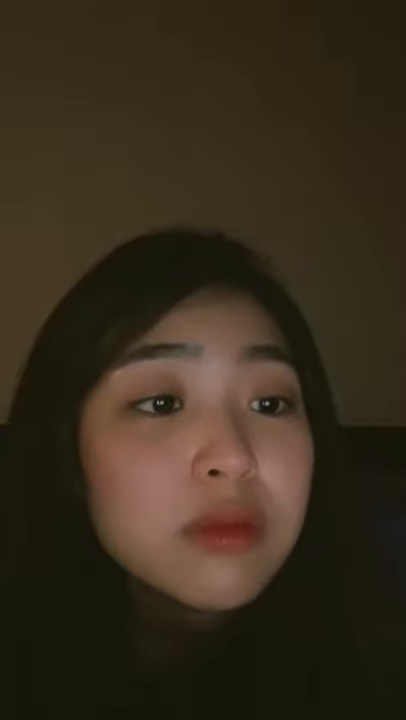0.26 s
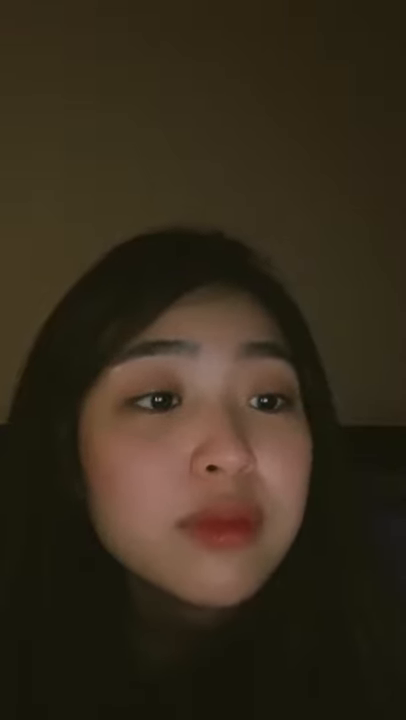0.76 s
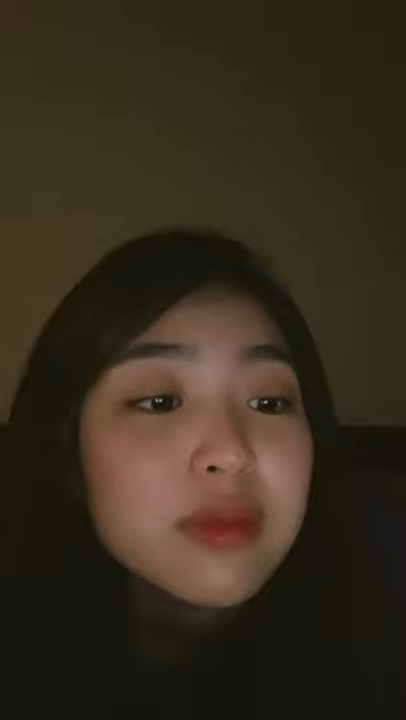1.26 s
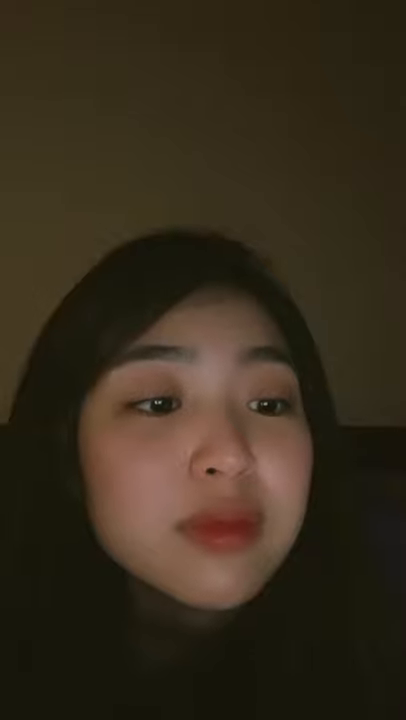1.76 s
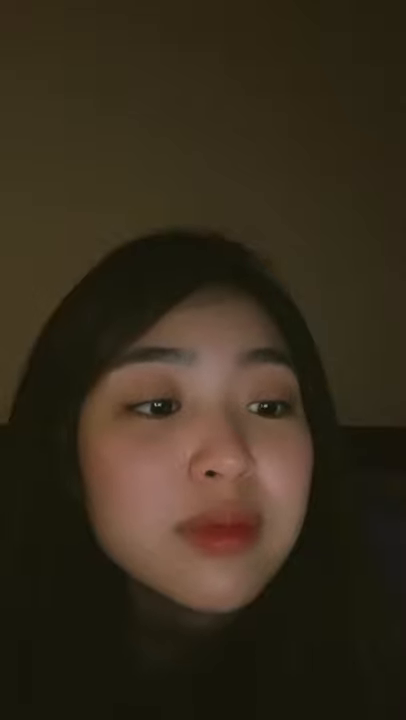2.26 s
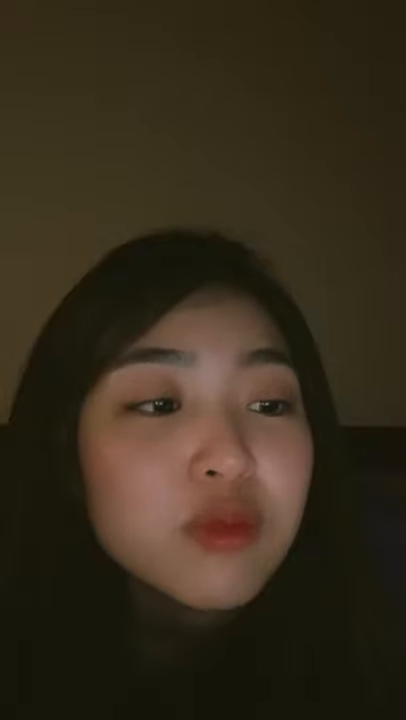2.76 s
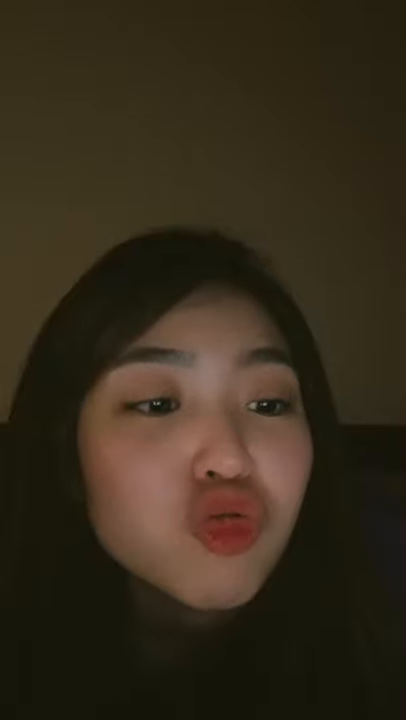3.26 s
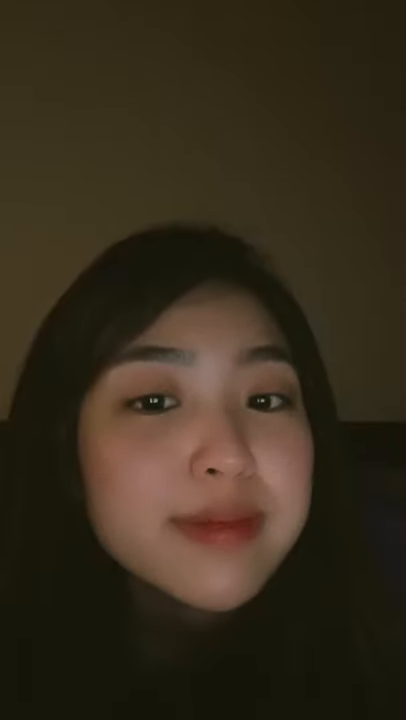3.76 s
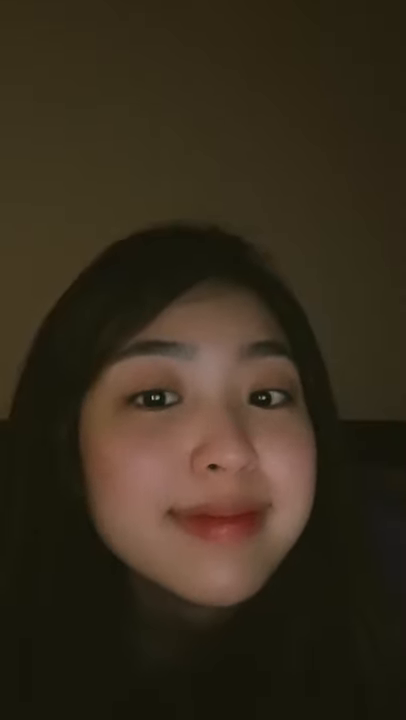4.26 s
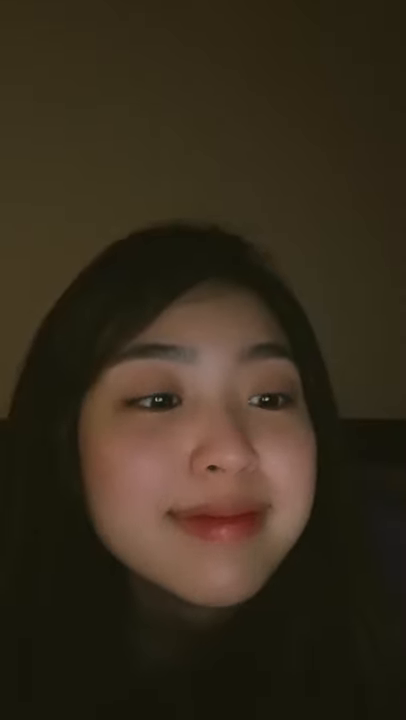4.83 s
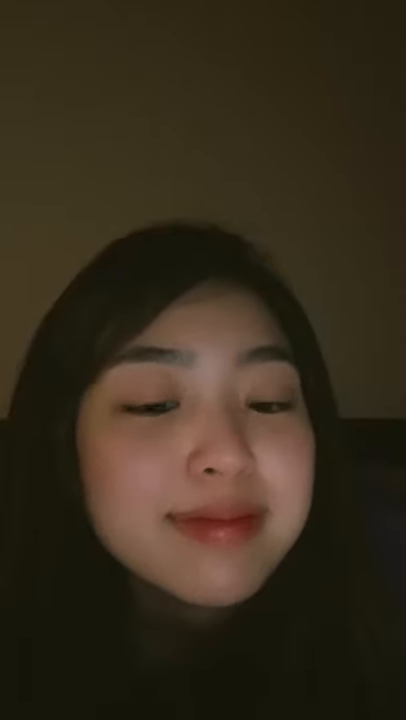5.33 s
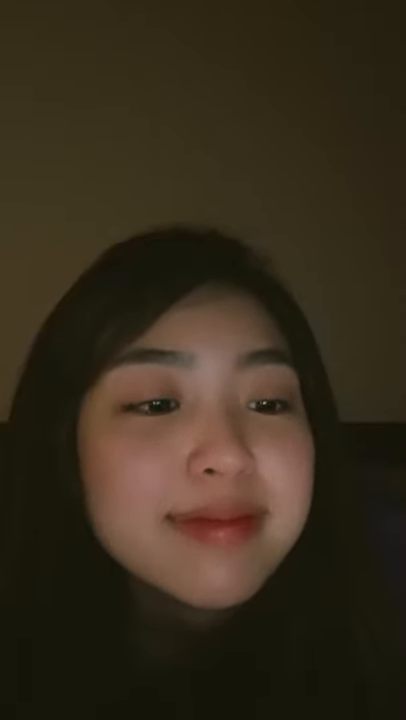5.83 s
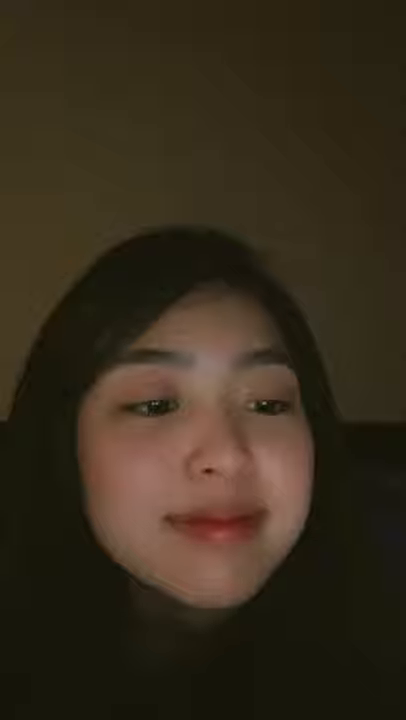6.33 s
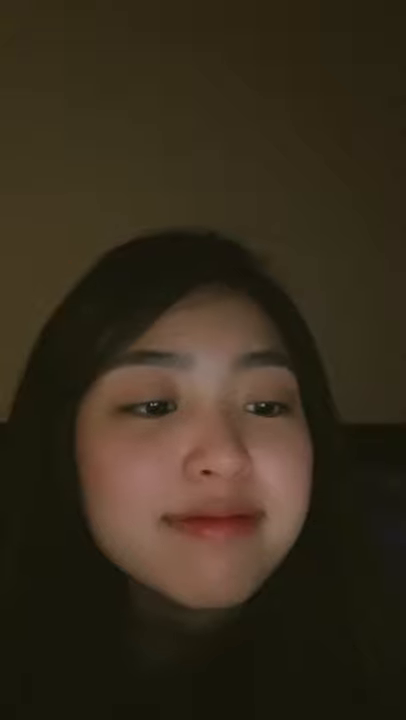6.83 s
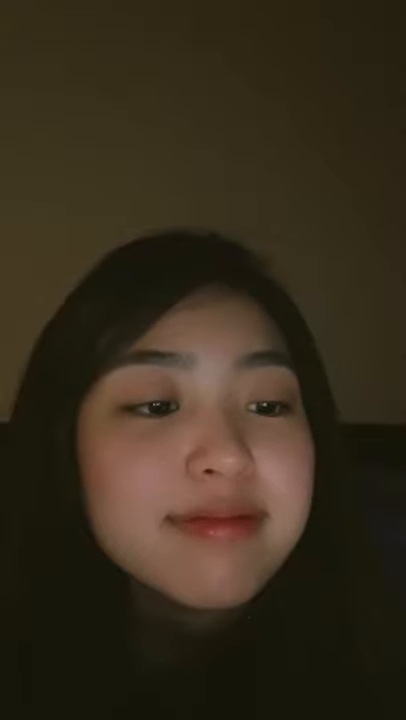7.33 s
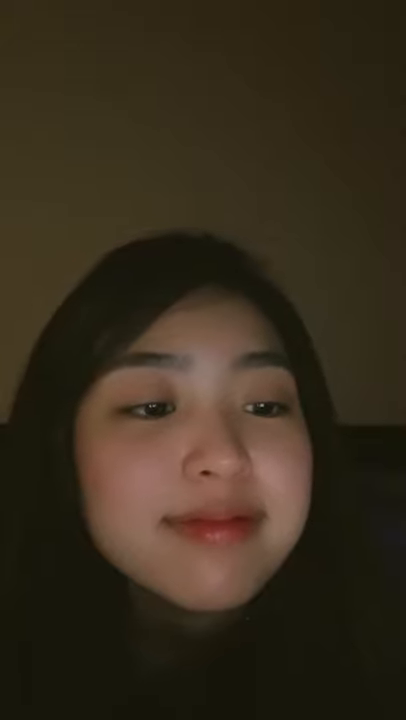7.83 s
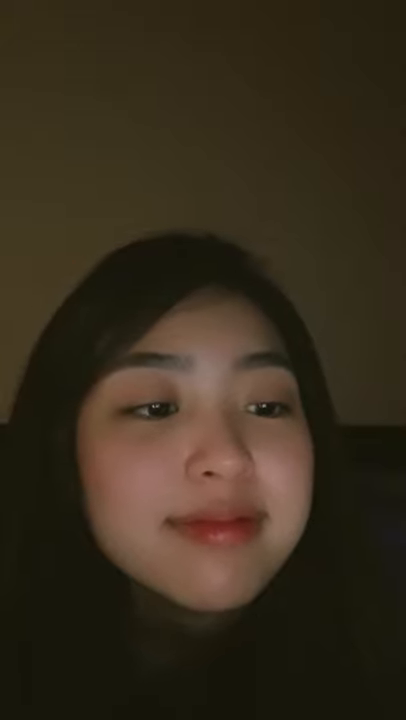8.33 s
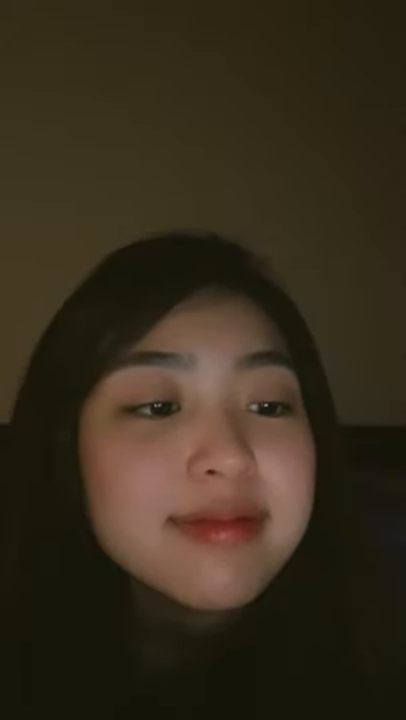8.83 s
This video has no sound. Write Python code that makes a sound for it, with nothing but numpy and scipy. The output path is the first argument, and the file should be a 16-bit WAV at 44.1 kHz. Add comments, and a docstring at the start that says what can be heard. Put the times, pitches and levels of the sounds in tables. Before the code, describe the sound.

Very close phone typing, picked up through the case in a small, quiet room with a short, faint tail. Modest clicks and soft thumps come first, then a near-silent gap. Lips squeak, fizz and snap wetly, followed by sparse grazing ticks and faint skin-on-glass strokes. Finally heavy rapid thumb taps knock the case in uneven bursts, mixed with sharp nail clicks and brief scuffs.

```python
"""Fast typing on a phone

Two thumbs type on a phone held close in a quiet room; its own microphone hears them through the case.
Tips and flats of the thumbs give a gritty click (skidding noise) and a dull knock (a short swing of the
case); grazing nails only click. In the pause come a squeaky kiss (fluttering lips, pops and wet fizz)
and a fingertip sliding over the glass (grainy noise). Then the typing resumes, harder."""
import sys
import numpy as np
from scipy import signal
from scipy.fft import rfft, irfft, next_fast_len
from scipy.io import wavfile
from scipy.ndimage import uniform_filter1d

SR = 44100
rng = np.random.default_rng(int(sys.argv[2]) if len(sys.argv) > 2 else 0)


def to_wav(s):
    """Save 16-bit WAV."""
    ch = np.atleast_2d(s).T  # columns
    pcm = np.round(np.clip(ch, -1, 1) * 32767)  # PCM
    wavfile.write(sys.argv[1], SR, pcm.astype(np.int16))


N = 400850  # length in samples

# Hum and hiss of the room and microphone: f/Hz, level/dB (only the shape counts)
QUIET_SPECTRUM = [(24, -21), (40, -1), (101, 0), (163, -11), (290, -7), (329, -10.5), (556, -13.5),
                  (790, -14), (965, -18.5), (2050, -18), (3470, -23.5), (3930, -21), (16000, -42)]
QUIET_DB = -63  # rms
# Colour of the sound coming back from the walls: f/Hz, level/dB (only the shape counts)
ROOM_SPECTRUM = [(60, 26), (250, -1.5), (900, 0), (2500, -16), (5000, -5.5), (14000, 5)]
# Nearby surfaces return the knock: delay/s, level/dB
NEARBY_ECHOES = [(.0175, -25.5), (0.041, -52)]

# Colour of the rumble of the case under friction: f/Hz, level/dB (only the shape counts)
RUMBLE_SPECTRUM = [(45, -18.5), (120, -0.5), (200, -3), (300, 6.5), (430, -7.5), (530, -13), (720, -1.5),
                   (950, -15), (1600, -21), (3000, -70)]
# Colour of the hiss of scraping nails and skin: f/Hz, level/dB (only the shape counts)
SCUFF_HISS_SPECTRUM = [(500, -25), (1100, -3), (2400, -0.5), (3200, -3), (4200, -9.5), (5100, -6.5),
                       (8000, -15.5), (9200, -22.5), (15000, -41.5)]
# Nails and skin scrape between taps: t/s of the peak, level/dB, swell time/s
SCUFF_EVENTS = [(5.561, -46, 0.012), (5.64, -43, 0.037), (5.796, -39.5, 0.017), (5.99, -53.5, 0.044),
                (6.2, -55.5, .04), (6.37, -42, 0.038), (6.533, -33, 0.0014), (6.56, -52, 0.044),
                (6.902, -31.5, 0.019), (7.23, -48, 0.05), (7.345, -50, 0.049), (7.45, -64, 0.067),
                (8.042, -46.5, .017), (8.133, -25, 0.002), (8.228, -48.5, .025), (8.37, -48.5, 0.019),
                (8.51, -36, 0.0039), (8.57, -38.5, 0.022), (8.981, -50.5, 0.02)]
SCUFF_FALL = 1.05  # dying time over swelling time
# Colour of the hiss of a fingertip on glass: f/Hz, level/dB (only the shape counts)
FINGERTIP_SPECTRUM = [(700, -17), (1400, -7), (2300, 3.5), (3100, 3), (3900, -13), (5100, -10.5),
                      (5900, -17.5), (14000, -36)]
# A fingertip strokes the glass: start t/s, end t/s, rumble level/dB, hiss level/dB at the outset
FINGERTIP_STROKES = [(4.49, 4.748, -47.5, -48), (4.789, 4.948, -47.5, -60.5), (4.991, 5.091, -48, -60.5),
                     (5.182, 5.27, -52.5, -56.5)]
STROKE_ATTACK_S, STROKE_RELEASE_S = 0.0042, 0.013
HISS_FADE_DB_PER_S = 54  # the skin hisses most as it sets off

# Resonances of the small gap between the lips: f/Hz, level/dB (only the shape counts)
LIP_GAP_SPECTRUM = [(500, -29.5), (1300, 13.5), (2500, -8), (3900, -25), (4950, 17.5), (5800, 0),
                    (7500, -3.5), (10000, -30), (15000, -53)]
# The lips squeak as they part, one glide each:
# start t/s, end t/s, first f/Hz, last f/Hz, level/dB, roughness (0-1)
LIP_SQUEAKS = [(3.188, 3.201, 1350, 775, -47, 0.5), (3.243, 3.269, 1448, 891, -34, .8),
               (3.278, 3.289, 2970, 2670, -35, 0.17), (3.297, 3.32, 2347, 2610, -26.5, .12),
               (3.677, 3.7, 3090, 2024, -35, 0.17)]
SQUEAK_ATTACK_S, SQUEAK_RELEASE_S = 0.0037, 0.0058
# Colour of the wet fizz and pops: f/Hz, level/dB (only the shape counts)
FIZZ_SPECTRUM = [(400, -9.5), (2000, 4.5), (3800, 2), (5200, 5.5), (7500, 8), (10000, -7), (14000, -18),
                 (16000, -22)]
# Wet fizz between the lips: start t/s, end t/s, level/dB
WET_FIZZES = [(3.246, 3.261, -35.5), (3.27, 3.35, -55.5), (3.684, 3.759, -44), (3.78, 3.846, -64)]
FIZZ_ATTACK_S, FIZZ_RELEASE_S = 0.0036, 0.013
# A film of saliva snaps: t/s, peak level/dB
SALIVA_POPS = [(3.062, -34.5), (3.7187, -13.5)]

# How the phone rings under a nail: f/Hz, level/dB (only the shape counts)
CASE_SPECTRUM = [(120, -1), (350, 5), (900, -3), (1300, -1.5), (1700, 1.5), (2100, 1), (3000, -3.5),
                 (3700, -4), (4300, -13.5), (5000, -5), (6000, -12), (8300, -19.5), (10000, -30.5),
                 (13000, -25.5), (15300, -31.5), (16500, -27)]
# Upper bending modes that a hard touch wakes, before chance shifts them:
# f/Hz, level/dB, time to fall by 60 dB/s
BENDING_MODES = [(488.6, 5, 0.033), (663, 2, 0.025), (751, -8, 0.051), (1056, -4.5, 0.019)]
# The tip of a thumb strikes, a click and then a knock: t/s of the click, click level/dB,
# dullness/dB (lows minus highs), knock level/dB, knock f/Hz, hardness/dB (upper modes against knock)
THUMB_TIP_TAPS = [(0.057, -34, 1, -27, 325, -22), (0.2052, -42, 8.5, -40, 584, -5),
                  (1.553, -28.5, -6.5, -27, 560, -10), (2.5478, -49.5, 8, -39, 607, -3),
                  (3.758, -43, 25, -41, 296, -8), (5.4617, -40.5, -3, -36, 307, -3),
                  (5.5669, -24.5, 0, -21, 276, -10.5), (5.617, -29, 12, -14, 284, -23),
                  (5.7278, -30, 1, -13.5, 307, -8), (5.784, -32, 1.5, -23.5, 566, -1),
                  (5.902, -41, 9, -17.5, 348, -8), (6.344, -34, 8, -12, 327, -10.5),
                  (6.4346, -42, 24, -24.5, 427, -7), (6.449, -29.5, 5.5, -13, 483, -1.5),
                  (6.469, -31, 7, -13.5, 386, -33), (6.5357, -14, 5, -4.5, 423, -10),
                  (6.637, -27, 11, -13.5, 304, -14.5), (6.6746, -30, 2, -21, 304, -10),
                  (6.6967, -38, 6.5, -15, 310.4, -13), (6.761, -24, 21, -8.5, 297, -20),
                  (6.814, -42, 12, -15.5, 332, -20), (6.8437, -37, 16, -16.5, 310, -2.5),
                  (6.941, -31.5, 10, -12, 306, -10), (7.066, -28.5, 8.5, -16, 257, -15),
                  (7.222, -27, 18, -11.5, 319, -10), (7.2915, -33, 13, -16, 316.7, -12),
                  (7.626, -44, 0, -27.5, 235.1, -11), (7.7588, -27, 16.5, -14.5, 306, -2),
                  (7.8123, -26, 4.5, -29.5, 412, -3.5), (7.9599, -23.5, 22.5, -21, 263, -2),
                  (8.037, -43, 14, -20.5, 326, -4), (8.055, -38.5, 2, -27, 344, -2),
                  (8.1376, -24.5, 8, -10.5, 325.6, -4), (8.2362, -31.5, 15.5, -16.5, 301, -14.5),
                  (8.5149, -18, 13.5, -7, 351, -9), (8.612, -36, 13.5, -16, 306, -10),
                  (8.6551, -28, 3.5, -11, 370.3, -36), (8.762, -40.5, 15.5, -13.8, 350, -26),
                  (8.779, -29.5, 10.5, -10.5, 288, -16), (8.9049, -37.5, 18, -15.5, 321, -21.5),
                  (8.9249, -39, 5, -16.5, 256.2, -6)]
# The flat of a thumb lands, a click and a knock, then a deep thump as the flesh presses home:
# t/s of the click, click level/dB, dullness/dB, knock level/dB, thump level/dB, thump f/Hz
THUMB_FLAT_TAPS = [(0.8289, -48.5, 18, -30.5, -30, 138.5), (1.021, -40.5, 4, -25.5, -33, 143),
                   (1.4051, -24.5, -7, -37.5, -22.5, 163), (1.5673, -40, 15, -29, -26, 179),
                   (1.647, -38, 6.5, -29, -30, 173), (1.7538, -39.5, 14, -28.5, -29, 172.3),
                   (1.8048, -39.5, 2, -31.5, -30, 172), (1.9353, -36, -4, -28.5, -27.5, 175),
                   (1.991, -37, 6, -30, -30, 183), (2.1026, -41, -4, -28.5, -26.5, 176),
                   (2.1665, -40.5, 4, -29, -30.5, 187), (6.0661, -35.5, 7.5, -17.5, -25.5, 149.5),
                   (6.137, -22.5, 2, -10.5, -15.5, 161.5), (6.2705, -28, 11.5, -19, -21, 160.4),
                   (6.3151, -21.5, -5.5, -14, -19, 151), (7.042, -33.5, 21, -24.5, -18, 154.6),
                   (7.16, -36, 14.5, -22.5, -19, 151), (7.5413, -24.5, -4.5, -19, -22, 197.3),
                   (7.9097, -37, 18.5, -20, -26.5, 150), (8.349, -26, 2, -30, -24, 153.8),
                   (8.382, -31.5, 20.5, -26.5, -16, 165.7), (8.471, -36, 10.5, -25, -19.5, 160.5),
                   (8.856, -35, 7.5, -36, -27, 151.5), (8.9892, -37, 7, -16.5, -23, 187.5)]
# A nail only grazes the glass: t/s, click level/dB, dullness/dB, skid time/s
NAIL_GRAZES = [(.0694, -37.5, 3, 0.0023), (.535, -53.5, 19, .0055), (1.1347, -50, 10, 0.0044),
               (1.19, -54.5, 21, .004), (1.4986, -44, -1, 0.0072), (1.7257, -28, -6.5, 0.0016),
               (1.8351, -46, 2, 0.0052), (1.9034, -33, -2, .0026), (2.0297, -46.5, -5, 0.0029),
               (2.06, -38, -2, 0.0027), (2.073, -43, 15, .003), (2.214, -55, 2, 0.0023),
               (2.3668, -36, 7.5, 0.0014), (2.4193, -43.5, 1, .0031), (2.4997, -54, -7, 0.003),
               (3.8487, -46, -1.5, 0.019), (3.9259, -49, 16, 0.013), (4.0208, -46, 5.5, 0.004),
               (4.1685, -44.5, 14.5, 0.0022), (4.68, -48.5, 5, 0.0065), (5.2295, -45.5, 3.5, 0.004),
               (5.491, -45, 3, .0048), (5.5104, -41, 14, 0.0012), (5.529, -45, 21, 0.0039),
               (5.643, -39.5, 7, 0.0036), (5.766, -41, -9, .0016), (5.9833, -36, 6, 0.004),
               (6.2, -40, 30, 0.0056), (6.46, -26, 6, 0.0041), (6.8705, -30.5, -1, .004),
               (6.8846, -19, 8, 0.00087), (6.9907, -33, 1, 0.0091), (7.1866, -41, -3, 0.003),
               (7.204, -33, -4, 0.0022), (7.2139, -22.5, 5.5, 0.00086), (7.234, -36, -1, 0.0031),
               (7.3595, -37.5, 5, 0.0029), (8.1583, -36, 13, 0.002), (8.245, -33.5, 16, .0027),
               (8.7417, -34, 4, .0016)]
# An ordinary tap: its click, its dullness and how long the nail skids
USUAL_CLICK_DB, USUAL_DULL_DB, USUAL_SKID_S = -35, 13, 0.0029
# Firm taps skid more briefly, dull ones for longer (doublings per dB)
SKID_PER_FORCE, SKID_PER_DULLNESS = 0.015, 0.028
# The knock follows the click by a fixed time, the thump by a few of its own cycles
KNOCK_LAG_S, THUMP_LAG_CYCLES = 0.0045, 2.65
# A flat tap firmer than usual knocks higher; hardness follows force, but a thump is always soft
FLAT_KNOCK_HZ, FLAT_OCTAVES_PER_DB = 305.26, 0.045
FLAT_HARD_DB, FLAT_HARD_PER_DB, THUMP_HARD_DB = -9.5, 0.38, -26

CLIP_LEVEL, CUTOFF_HZ = 0.88, 16000  # the microphone's limits


def from_db(db):
    """Turn decibels into a gain."""
    return 10 ** (np.asarray(db) / 20)


def rms_one(x):
    """Scale to an rms (average strength) of 1."""
    return x / np.sqrt(np.mean(x ** 2) + 1e-20)


def colour(x, points):
    """Filter by a curve through (f/Hz, level/dB) points, straight over log frequency."""
    size = next_fast_len(len(x))
    hz, db = np.transpose(points)
    bins = np.maximum(np.arange(size // 2 + 1) * SR / size, 1)
    gain = from_db(np.interp(np.log(bins), np.log(hz), db))
    return irfft(rfft(x, size) * gain, size)[:len(x)]


def wander(rate):
    """A random line that picks a new value `rate` times a second, with rms 1."""
    knots = rng.standard_normal(N // 4)
    return rms_one(np.interp(np.arange(N) * rate / SR, np.arange(len(knots)), knots))


def grainy(points, grain_db, rate):
    """Coloured friction noise in uneven grains that gather into clumps, with rms 1."""
    grains = 0.8 * wander(rate) + 0.6 * wander(rate / 5)
    noise = rng.standard_normal(N) * from_db(grain_db * grains)
    return rms_one(colour(noise, points))


def held(start, end, attack_s, release_s):
    """An envelope that rises until start, holds at 1 until end and dies away."""
    clock = np.arange(N) / SR
    before, after = np.maximum(start - clock, 0), np.maximum(clock - end, 0)
    return np.exp(-before / attack_s - after / release_s) + 1e-18


def centred_time(size):
    """Seconds before and after the middle of a short sound."""
    return (np.arange(size) - size // 2) / SR


def add(out, s, sound):
    """Mix in a sound whose middle falls at time s."""
    start = round(s * SR) - len(sound) // 2
    lo, hi = max(start, 0), min(start + len(sound), N)
    out[lo:hi] += sound[lo - start:hi - start]


def quiet_room():
    """Steady noise with the colour of the room and microphone."""
    return from_db(QUIET_DB) * rms_one(colour(rng.standard_normal(N), QUIET_SPECTRUM))


def room(x, t60, wet_db, gap_s=0.01114):
    """A short diffuse tail from the walls: fading noise that starts after a small gap."""
    t = np.arange(SR // 2) / SR
    tail = colour(rng.standard_normal(len(t)), ROOM_SPECTRUM) * from_db(-60 * t / t60) * (t > gap_s)
    return from_db(wet_db) * signal.fftconvolve(x, tail / np.sqrt(np.sum(tail ** 2)))[:N]


def echoes(x):
    """A few weak, late copies from nearby surfaces."""
    clock = np.arange(N) / SR
    return sum(from_db(db) * np.interp(clock - delay, clock, x) for delay, db in NEARBY_ECHOES)


def scuffing():
    """Friction of nails and skin hisses in the air and, just as it swells, rumbles through the case."""
    drag = sum(from_db(db) * held(s, s, swell_s, SCUFF_FALL * swell_s) for s, db, swell_s in SCUFF_EVENTS)
    hiss = grainy(SCUFF_HISS_SPECTRUM, grain_db=5.5, rate=290)
    rumble = grainy(RUMBLE_SPECTRUM, grain_db=4.0, rate=71)
    return drag * (hiss + rumble)


def rubbing():
    """A fingertip drags over the glass: the case rumbles throughout, the hiss of the skin fades."""
    rumble, hiss, clock = 0, 0, np.arange(N) / SR
    for start, end, rumble_db, hiss_db in FINGERTIP_STROKES:
        touch = held(start, end, STROKE_ATTACK_S, STROKE_RELEASE_S)
        rumble = rumble + from_db(rumble_db) * touch
        fading_db = hiss_db - HISS_FADE_DB_PER_S * np.maximum(clock - start, 0)
        hiss = hiss + from_db(fading_db) * touch
    rumbling = rumble * grainy(RUMBLE_SPECTRUM, grain_db=2.5, rate=210)
    return rumbling + hiss * grainy(FINGERTIP_SPECTRUM, grain_db=3.0, rate=180)


def lip_pops(decay_s=0.00026, size=1024):
    """Each snap of saliva is a tiny burst of noise in the gap between the lips."""
    out, t = np.zeros(N), centred_time(size)
    for s, db in SALIVA_POPS:
        burst = rng.standard_normal(size) * np.exp(-np.abs(t) / decay_s)
        pop = colour(burst, FIZZ_SPECTRUM)
        add(out, s, from_db(db) * pop / np.abs(pop).max())
    return out


def lip_squeaks(jitter=0.39):
    """Tight wet lips flutter, roughly or cleanly, and ring the small gap between them."""
    clock = np.arange(N) / SR
    starts, ends, first_hz, last_hz, _, roughness = np.transpose(LIP_SQUEAKS)
    turns = np.column_stack([starts, ends]).ravel()
    glide_hz = np.interp(clock, turns, np.column_stack([first_hz, last_hz]).ravel())
    rough = np.interp(clock, turns, np.repeat(roughness, 2))
    pitch = glide_hz * np.exp(jitter * rough * wander(1500))
    phase = 2 * np.pi * np.cumsum(pitch) / SR
    # ten equal harmonics, leaving out any too high to represent
    pulses = sum(np.cos(k * phase) * (k * pitch < SR / 2) for k in range(1, 11))
    tone = colour(pulses, LIP_GAP_SPECTRUM)
    # even out the strength, so that the table alone sets the level
    tone /= np.sqrt(np.abs(uniform_filter1d(tone ** 2, size=256)) + 1e-9)
    loudness = sum(from_db(db) * held(start, end, SQUEAK_ATTACK_S, SQUEAK_RELEASE_S)
                   for start, end, _, _, db, _ in LIP_SQUEAKS)
    return loudness * tone


def lip_fizz():
    """Wetness between the lips fizzes as fine grainy noise."""
    loudness = sum(from_db(db) * held(start, end, FIZZ_ATTACK_S, FIZZ_RELEASE_S)
                   for start, end, db in WET_FIZZES)
    return loudness * grainy(FIZZ_SPECTRUM, grain_db=2.5, rate=900)


def knock_rows():
    """The case gives once under a tip, twice under a flat thumb: (t/s, level/dB, f/Hz, hardness/dB)."""
    rows = [(s + KNOCK_LAG_S, db, hz, hard_db) for s, _, _, db, hz, hard_db in THUMB_TIP_TAPS]
    for s, click_db, _, knock_db, thump_db, thump_hz in THUMB_FLAT_TAPS:
        force_db = click_db - USUAL_CLICK_DB
        knock_hz = FLAT_KNOCK_HZ * 2 ** (FLAT_OCTAVES_PER_DB * max(force_db, 0))
        hard_db = FLAT_HARD_DB + FLAT_HARD_PER_DB * force_db
        rows.append((s + KNOCK_LAG_S, knock_db, knock_hz, hard_db))
        rows.append((s + THUMP_LAG_CYCLES / thump_hz, thump_db, thump_hz, THUMP_HARD_DB))
    return rows


def hand_sway(low_hz=62, high_hz=125, width_s=0.0057, lag_s=0.0126, level_db=-17.0, size=4096):
    """The phone rocks softly in the hand after each knock or thump, at two low pitches."""
    out, t = np.zeros(N), centred_time(size)
    for s, db, _, _ in knock_rows():
        rocking = sum(np.sin(2 * np.pi * (hz * t + rng.random())) for hz in (low_hz, high_hz))
        envelope = np.exp(-0.5 * (t / width_s) ** 2)
        add(out, s + lag_s, from_db(db + level_db) * envelope * rocking)
    return out


def low_ring(knocks, hz=160, width_hz=22, level_db=4.0):
    """The phone's lowest resonance hums on briefly, driven by a knock and its echoes."""
    r = np.exp(-np.pi * width_hz / SR)
    poles = [1, -2 * r * np.cos(2 * np.pi * hz / SR), r * r]
    zeros = (1 - r * r) / 2 * np.array([1, 0, -1])
    drive = echoes(knocks) + from_db(-9) * knocks
    return from_db(level_db) * signal.lfilter(zeros, poles, drive)


def woody_ring(lead_s=0.004127, attack_s=0.0014, spread_db=1.5, spread_pitch=0.036, size=4096):
    """A hard touch rings the upper modes from just before the case swings furthest."""
    out, age = np.zeros(N), np.maximum(centred_time(size), 0)
    for s, db, _, hard_db in knock_rows():
        for hz, mode_db, t60 in BENDING_MODES:
            fading_db = mode_db + spread_db * rng.standard_normal() - 60 * age / t60
            envelope = (1 - np.exp(-age / attack_s)) * from_db(fading_db)
            cycles = hz * (1 + spread_pitch * rng.standard_normal()) * age + rng.random()
            add(out, s - lead_s, from_db(db + hard_db) * envelope * np.sin(2 * np.pi * cycles))
    return out


def case_knocks(rise_cycles=0.66, fall_cycles=0.88, sag=0.19, size=4096):
    """The case swings for two or three cycles, sinking in pitch as the thumb loads it."""
    t = centred_time(size)
    swing, pitch = np.zeros(N), np.zeros(N)
    for s, db, hz, _ in knock_rows():
        cycles = t * hz
        width = np.where(t < 0, rise_cycles, fall_cycles)
        power = (from_db(db) * np.exp(-0.5 * (cycles / width) ** 2)) ** 2
        add(swing, s, power)
        add(pitch, s, power * hz * (1 - sag * np.tanh(cycles)))
    # overlapping touches drive one and the same swing, at their average pitch weighted by power
    phase = 2 * np.pi * (np.cumsum(pitch / (swing + 1e-18)) / SR + rng.random())
    return np.sqrt(swing) * np.sin(phase)


def click_rows():
    """Every touch clicks: (t/s, level/dB, dullness/dB, skid time/s)."""
    rows = []
    for s, db, dull_db, *_ in list(THUMB_TIP_TAPS) + list(THUMB_FLAT_TAPS):
        longer = SKID_PER_DULLNESS * (dull_db - USUAL_DULL_DB)
        shorter = SKID_PER_FORCE * (db - USUAL_CLICK_DB)
        rows.append((s, db, dull_db, USUAL_SKID_S * 2 ** (longer - shorter)))
    return rows + list(NAIL_GRAZES)


def nail_clicks(rise=0.33, ring_s=0.01, ring_db=-22, grit_db=5.0, grit_hz=600,
                spot_db=1.8, soft=0.53, soft_from_db=8.5, split_hz=2750, size=4096):
    """The nail skids for some milliseconds and rattles off; each spot favours other case resonances."""
    out, t = np.zeros(N), centred_time(size)
    hz = np.arange(size // 2 + 1) * SR / size
    low_share = 1 / (1 + (hz / split_hz) ** 8)
    spots = np.geomspace(600, 16000, 30)  # Hz
    for s, db, dull_db, skid_s in click_rows():
        skid_s = max(skid_s, 1e-4)
        age = t + 0.5 * skid_s
        # grit makes the rattle uneven
        bumps = np.interp((t - t[0]) * grit_hz, np.arange(size), rng.standard_normal(size))
        rattle = from_db(grit_db * bumps) * from_db(ring_db) * np.exp(-np.abs(age) / ring_s)
        landing = np.exp(-np.abs(age) / (rise * skid_s))
        fall = np.exp(-np.abs(age) / skid_s) + rattle
        skid = colour(rng.standard_normal(size) * np.where(age < 0, landing, fall), CASE_SPECTRUM)
        # the softer the touch, the lower its weight lies
        softening = soft * max(dull_db - soft_from_db, 0) * np.minimum(np.log2(spots / split_hz), 0)
        spot_levels = spot_db * rng.standard_normal(len(spots)) - softening
        skid = colour(skid, np.column_stack([spots, spot_levels]))
        # balance lows against highs by the dullness
        lows = irfft(rfft(skid) * low_share)
        click = from_db(dull_db) * rms_one(lows) + rms_one(skid - lows)
        # the level is that of the whole click's energy packed into 10 ms
        add(out, s, from_db(db) * rms_one(click) * np.sqrt(SR / 100 / size))
    return out


def scene():
    """Taps, rubbing and the kiss over the quiet of the room."""
    background = quiet_room() + scuffing() + rubbing()
    lips = lip_squeaks() + lip_fizz() + lip_pops()
    kiss = lips + room(lips, t60=0.33, wet_db=-10)
    knocks = case_knocks() + woody_ring()
    thuds = knocks + echoes(knocks) + room(knocks, t60=0.32, wet_db=-20) + low_ring(knocks) + hand_sway()
    clicks = nail_clicks()
    taps = thuds + clicks + room(clicks, t60=0.37, wet_db=-14.5)
    return (background + kiss + taps)[None]


def record(dry):
    """The small microphone loses the deepest bass and clips tall peaks; the top is cut steeply."""
    bass_cut = signal.butter(3, 47, "high", fs=SR, output="sos")
    top_cut = signal.ellip(10, 0.1, 70, CUTOFF_HZ, fs=SR, output="sos")
    thin = signal.sosfilt(bass_cut, dry)
    return signal.sosfilt(top_cut, np.clip(thin, -CLIP_LEVEL, CLIP_LEVEL))


dry = scene()
out = record(dry)
to_wav(out)
```